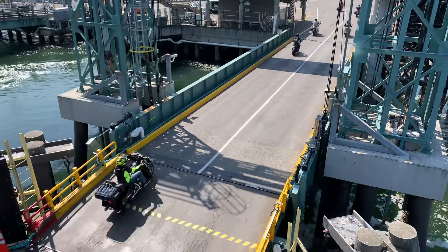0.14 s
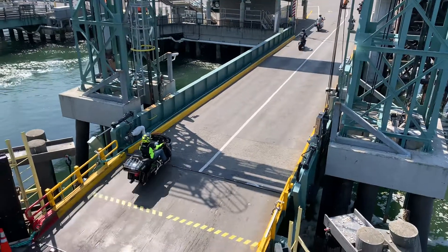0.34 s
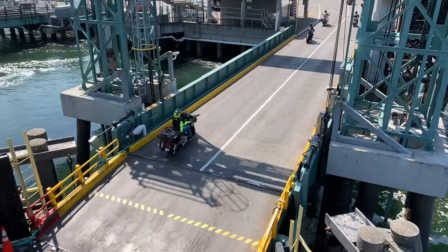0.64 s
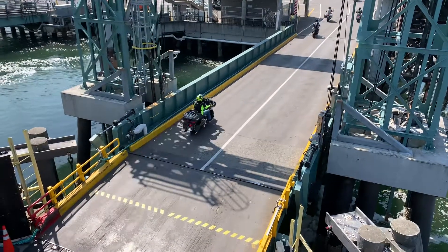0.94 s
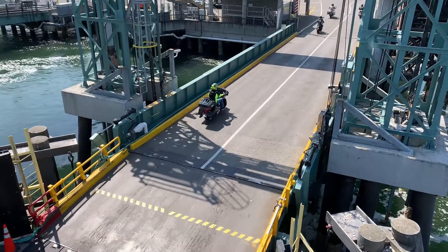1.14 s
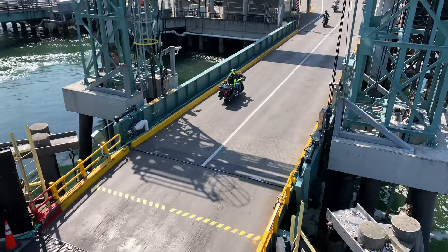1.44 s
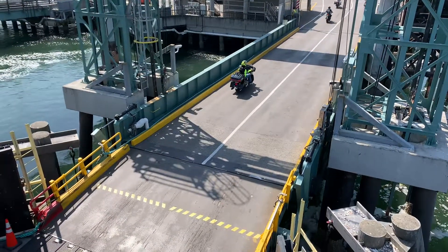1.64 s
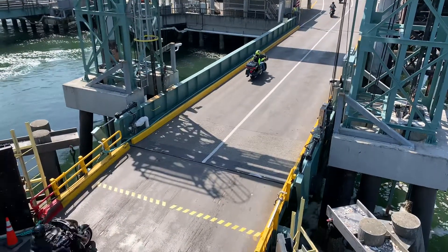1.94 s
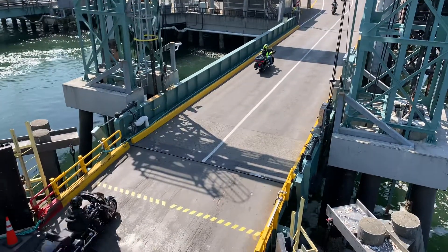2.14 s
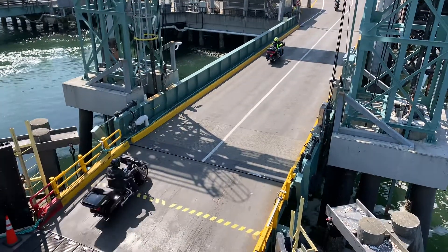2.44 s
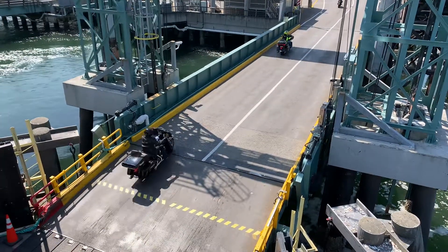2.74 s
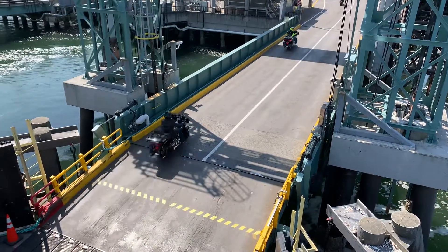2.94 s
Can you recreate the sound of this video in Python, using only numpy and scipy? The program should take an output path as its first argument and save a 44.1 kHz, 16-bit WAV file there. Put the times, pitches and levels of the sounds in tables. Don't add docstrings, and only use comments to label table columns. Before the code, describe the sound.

Motorcycle engines rumble and throb up a metal ramp over a steady roar and faint water hiss

```python
import sys
import numpy as np
from scipy import signal
from scipy.fft import rfft, irfft, next_fast_len
from scipy.io import wavfile

SR = 44100
rng = np.random.default_rng(int(sys.argv[2]) if len(sys.argv) > 2 else 0)


def generate_wav(sig):
    pcm = np.round(np.clip(np.atleast_2d(sig).T, -1, 1) * 32767).astype(np.int16)
    wavfile.write(sys.argv[1], SR, pcm)


def gain_from_db(level_db):
    decades = np.asarray(level_db, float) / 20
    return 10 ** decades


N = 136710

# (time [s], cycle rate [Hz])
TICKER_CYCLE = [
    (0.5, 17.05),
    (0.8, 18.12),
    (1.1, 19.12),
    (1.5, 20.27),
    (1.9, 21.42),
    (2.4, 21.52),
]
TICKER_START_TURNS = 0.627
# (time [s], boom level [dB], tick level [dB])
TICKER_NEARNESS = [
    (0.55, -71, -70),
    (0.72, -29, -52),
    (0.95, -29, -50),
    (1.3, -26.5, -48.5),
    (1.53, -26, -48),
    (1.7, -31, -49),
    (1.93, -26.5, -43),
    (2.1, -30.5, -43),
    (2.4, -35, -51),
]
# (frequency [Hz], common share [0-1])
PORT_LIKENESS = [(60, 1), (200, 0.96), (430, 0.81), (1000, 0.6), (2000, 0.35), (4400, 0.42), (6300, 0),
                 (7400, 1)]
# (frequency [Hz], level [dB])
LEFT_OVER_RIGHT = [(60, -.5), (130, -2.5), (290, 1), (640, 2.5), (1410, 3.5), (3100, 0), (6820, -3.5),
                   (15000, 5.5)]
SIDES = np.array([[1], [-1]])


def rms_one(x):
    return x / np.sqrt(np.mean(x ** 2) + 1e-20)


def in_time(rows):
    s, *columns = np.transpose(rows)
    return [np.interp(np.arange(N) / SR, s, c) for c in columns]


def at_hz(points, hz):
    points_hz, values = np.array(points)[:, 0], np.array(points)[:, 1]
    return np.interp(np.log(hz), np.log(points_hz), values)


def drift(rate_hz, step=1):
    r = np.exp(-80 * np.pi * rate_hz / SR)
    white = rng.standard_normal(N // 40 + 2002)
    slow = signal.lfilter([1], [1, -2 * r, r * r], white)[2000:]
    return np.interp(np.arange(0, N, step) / 40, np.arange(len(slow)), rms_one(slow))


def resonate(x, hz, width_hz):
    r = np.exp(-np.pi * width_hz / SR)
    zeros = np.array([1, 0, -1]) * (1 - r * r) / 2
    poles = [1, -2 * r * np.cos(2 * np.pi * hz / SR), r * r]
    return signal.lfilter(zeros, poles, x)


def port_noise():
    # (frequency [Hz], lag [turns])
    left_lag = [(1100, 0), (1500, .14), (2250, .15), (2950, .74), (4300, 1.02), (5100, 1.0), (7430, 2),
                (16000, 3.34)]
    white = rng.standard_normal((4, N))
    size = next_fast_len(N)
    lag_turns = np.interp(np.fft.rfftfreq(size, 1 / SR), *np.transpose(left_lag))
    white[1] = irfft(rfft(white[0], size) * np.exp(-2j * np.pi * lag_turns), size)[:N]
    return white


def ports(white, hz):
    alike = np.clip(at_hz(PORT_LIKENESS, hz), 0, 1)
    shared, own = white[[1, 0]], white[2:]
    balance = gain_from_db(at_hz(LEFT_OVER_RIGHT, hz) / 2 * SIDES)
    return balance * (np.sqrt(alike) * shared + np.sqrt(1 - alike) * own)


def exhaust(cycle_hz, boom_db, rasp_db, orders, start_turns):
    step = 8
    boom_below_hz, jitter, thump_spread_turns = 115, 0.002, 0.1
    flutter_db, flutter_hz, thump_uneven_db = 1.3, 3, 1.0
    turns = (np.cumsum(cycle_hz * (1 + jitter * drift(8))) / SR)[::step] + start_turns
    out = 0
    for multiple, db in orders:
        multiple = round(multiple)
        hz = multiple * cycle_hz.mean()
        effort_db = (boom_db if hz < boom_below_hz else rasp_db)[::step]
        alike = np.clip(at_hz(PORT_LIKENESS, hz), 0, 1)
        skew_rad = np.arccos(alike) / 2 * drift(2.7, step) * SIDES
        offset_turns = thump_spread_turns * rng.standard_normal()
        tone = -np.cos(2 * np.pi * (multiple * turns + offset_turns) + skew_rad)
        tone_db = effort_db + db + flutter_db * drift(flutter_hz, step)
        out = out + np.sqrt(2) * gain_from_db(tone_db) * tone
    uneven = gain_from_db(thump_uneven_db * drift(13.3, step))
    return signal.resample_poly(out * uneven, step, 1, axis=1)[:, :N]


def motorcycles():
    # (time [s], cycle rate [Hz], boom level [dB], rasp level [dB])
    first_effort = [(0.0, 14.9, -19.5, -15.5), (0.1, 15.1, -22.5, -19.5), (0.3, 15.45, -17.5, -21),
                    (0.45, 15.5, -21, -18.5), (0.62, 15.45, -18, -21), (0.73, 15.5, -33, -18),
                    (0.82, 15.55, -23.5, -20.5), (1.0, 15.65, -38, -22.5), (1.2, 15.7, -30, -30),
                    (1.6, 15.6, -47, -34)]
    second_effort = [(0.6, 16.6, -23, -51.5), (0.72, 17.7, -25.5, -34), (0.83, 16.8, -18, -26),
                     (0.95, 17.2, -26, -37), (1.1, 17.4, -20.5, -22.5), (1.4, 17.6, -22.5, -22.5),
                     (1.6, 16.94, -17, -21), (1.95, 18.06, -20.5, -20.5), (2.14, 18.64, -23.5, -23.5),
                     (2.3, 18.05, -18, -23), (2.64, 18.6, -16.5, -19), (2.8, 18.3, -21.5, -21),
                     (2.95, 21, -26, -22), (3.1, 19.7, -17.5, -19.5)]
    third_effort = [
        (2.0, 13.4, -32, -37),
        (2.2, 13.6, -27, -27),
        (2.62, 14.76, -35, -17),
        (2.8, 14.7, -22.5, -19),
        (2.95, 14.7, -21, -19),
        (3.1, 15.5, -14.5, -16),
    ]
    # (multiple of cycle [1], level [dB])
    first_orders = [(2, -14), (3, -36), (4, 0), (5, 1), (6, -7), (7, -12.5), (8, -7.5), (10, -9), (12, -8),
                    (14, -8), (16, -15), (20, -12.5), (24, -35), (28, -16)]
    second_orders = [(2, -21), (3, -2.5), (4, 0.5), (5, 0.5), (6, -20.5), (7, -13.5), (8, -17), (9, -8),
                     (10, -5.5), (11, -10), (15, -20), (13, -13), (17, -20), (19, -15.5), (21, -22.5),
                     (26, -17.5)]
    third_orders = [(2, -11), (4, 1.5), (5, -13), (7, -6.5), (8, -12), (9, -12.5), (12, -9), (14, -15),
                    (18, -13), (19, -22.5)]
    ticker_orders = [(2, -19), (5, 1.5), (7, 2.5), (9, -4.5), (16, -20), (18, -13)]

    out = exhaust(*in_time(first_effort), first_orders, start_turns=0.49)
    out = out + exhaust(*in_time(second_effort), second_orders, start_turns=0.46)
    out = out + exhaust(*in_time(third_effort), third_orders, start_turns=0.3)
    near_db = in_time(TICKER_NEARNESS)[0]
    cycle_hz = in_time(TICKER_CYCLE)[0]
    out = out + exhaust(cycle_hz, near_db, near_db, ticker_orders, TICKER_START_TURNS)
    return gain_from_db(-2.0 + at_hz(LEFT_OVER_RIGHT, 59) / 2 * SIDES) * out


def traffic_db():
    # (time [s], level [dB])
    ramp_traffic = [(0.0, -39), (.25, -43.5), (0.41, -42.5), (0.62, -42.5), (.72, -43.5), (0.91, -40.5),
                    (1.3, -39.5), (1.6, -41), (1.84, -40), (2.15, -42), (2.5, -38.5), (3.1, -42)]
    busy_db = in_time(ramp_traffic)[0]
    return busy_db - busy_db.mean()


def banded_noise(spectrum, low_hz, high_hz, patchy_db, swell_db):
    # (time [s], level [dB])
    deck_swell = [(0.0, 1), (0.5, -1), (0.7, -0.5), (1.05, 0.5), (1.2, -2), (1.5, -1), (1.7, 0.5),
                  (2.05, -0.5), (2.5, 1), (3.1, 0)]
    out, together = 0, drift(22.4)
    edges_hz = low_hz * 2 ** np.arange(0, np.log2(high_hz / low_hz), 1 / 2.5)
    white = [port_noise(), port_noise()]
    deck_db = in_time(deck_swell)[0]
    for k, (low, high) in enumerate(zip(edges_hz, edges_hz[1:])):
        hz = np.sqrt(low * high)
        sos = signal.butter(2, [low, high], "band", fs=SR, output="sos")
        band = signal.sosfilt(sos, ports(white[k % 2], hz))
        swell = swell_db * np.clip(np.log2(hz / 1600) / 1.1, 0, 1) + deck_db * (hz < 700)
        flicker_db = patchy_db * (0.6 * together + drift(26.0))
        out = out + gain_from_db(at_hz(spectrum, hz) + swell + flicker_db) * band
    return rms_one(out)


def deck_roar():
    # (frequency [Hz], density [dB per Hz])
    roar_spectrum = [(22, -33), (45, -6), (80, -7), (230, -9), (600, -26.5), (1050, -25.5), (2750, -31),
                     (3300, -32)]
    noise = banded_noise(roar_spectrum, 18, 4700, patchy_db=0.74, swell_db=traffic_db())
    edge = signal.cheby1(8, 1, 2870, fs=SR, output="sos")
    return signal.sosfilt(edge, gain_from_db(-21.5) * noise)


def churned_water():
    # (frequency [Hz], density [dB per Hz])
    water_spectrum = [(3300, -0.5), (4300, -1.5), (5700, -7), (8000, -4), (9500, -5.5), (12500, -10),
                      (14500, -17), (16500, -29)]
    return gain_from_db(-41.5) * banded_noise(water_spectrum, 3080, 17000, patchy_db=1.45, swell_db=0.7 * traffic_db())


def generator():
    hum_hz, hum_db = 358.2, -42.5
    return gain_from_db(hum_db + 1.7 * drift(3.4)) * np.sin(2 * np.pi * hum_hz * np.arange(N) / SR)


def fade_between(start_s, end_s):
    t = np.arange(N) / SR
    return np.clip(np.minimum(t - start_s, end_s - t) / 0.14 + 0.5, 0, 1)


def narrow_band(white, hz, width_hz):
    return rms_one(resonate(resonate(ports(white, hz), hz, width_hz), hz, width_hz))


def whines():
    # (frequency [Hz], width [Hz], level [dB], start [s], end [s])
    whine_bands = [
        (1074, 270, -44, -0.8, 3.4),
        (236.4, 23, -26, 0.605, 0.8),
        (4340, 1300, -45.5, 1.38, 2.205),
    ]
    white, out = port_noise(), 0
    for hz, width_hz, db, start_s, end_s in whine_bands:
        wavering = gain_from_db(db + 1.1 * drift(1.9))
        out = out + fade_between(start_s, end_s) * wavering * narrow_band(white, hz, width_hz)
    return out


def gears():
    # (start frequency [Hz], end frequency [Hz], level [dB], start [s], end [s])
    gear_slides = [(1850, 1990, -62, 0.083, 0.98), (982, 1080, -42, .2, 0.91), (1558, 1670, -42, .8, 1.65),
                   (2915, 3050, -45, 0.62, 2.7), (3280, 3350, -50.5, .72, 3.2),
                   (1134, 1210, -45.5, .9, 1.55), (2194, 2340, -45.5, 1.75, 3.0),
                   (1018, 910, -44.5, 1.75, 3), (845, 925, -37, 3, 3.05), (1343, 1200, -41, 2.45, 2.7),
                   (1634, 1720, -45.5, 2.3, 3.4)]
    white, t, out = port_noise(), np.arange(N) / SR, 0
    for from_hz, to_hz, db, start_s, end_s in gear_slides:
        band = signal.hilbert(narrow_band(white, from_hz, width_hz=0.047 * from_hz))
        slide_hz = np.interp(t, [start_s, end_s], [0, to_hz - from_hz])
        slid = np.real(band * np.exp(2j * np.pi * np.cumsum(slide_hz) / SR))
        out = out + fade_between(start_s, end_s) * gain_from_db(db + 1.6 * drift(2.2)) * slid
    return out


def ticks():
    # (frequency [Hz], width [Hz], level [dB])
    valve_rings = [(2940, 400, -20), (4510, 240, 1.5), (5440, 780, 2.5), (6300, 600, -1), (7900, 1100, 1),
                   (12600, 2000, -19)]
    # (time [s], level [dB], low rings [dB], high rings [dB])
    clear_ticks = [(0.6682, -35, -11, -11), (0.7206, -35, -7, -15), (0.746, -35, -9, -3),
                   (0.777, -28, -12, -10), (0.801, -27, -3, -16), (0.8323, -30, -7, -6),
                   (0.8562, -28, -3, -13), (0.8867, -32, -8, -9), (0.9106, -30, -6, -9),
                   (0.94, -26, -13, 0), (0.965, -30, -2, -11), (0.9929, -30, -15, -10),
                   (1.0179, -37, -11, -12), (1.0428, -32, -9, -10), (1.0723, -40, -15, -3),
                   (1.0997, -34, -13, -10), (1.1511, -30, -3, -9), (1.2538, -29, -6, -11),
                   (1.3062, -36, -10, -9), (1.3272, -32, -11, -7), (1.3631, -28, -9, -7),
                   (1.4066, -28, -12, -13), (1.4289, -26, -9, -12), (1.4559, -26, -9, -8),
                   (1.4763, -29, -10, -11), (1.5057, -27, -9, -8), (1.5273, -27.5, -1, -11),
                   (1.5544, -26, -6, -13), (1.5756, -42, -6, -12), (1.7013, -30, -3, -10),
                   (1.733, -30, -3, -7), (1.7942, -33, -9, -12), (1.8153, -37, -12, -16),
                   (1.8405, -36, -9, -11), (1.8903, -20, -11, -20), (1.9118, -28, -9, -10),
                   (1.9373, -22, -12, -8), (1.9582, -28, -7, -9), (1.9832, -36, -13, -11),
                   (2.0051, -34, -12, -9), (2.0944, -35, -9, -10), (2.1493, -31, -14, -10),
                   (2.1886, -29, -12, -13), (2.2286, -31, -7, -11), (2.3977, -31, -11, -12),
                   (2.4516, -33, -8, -8), (2.511, -29, -6, -9), (2.553, -26, -11, -11)]
    second_firing_turns, high_rings_hz = 0.45, 5800
    decay_s, scatter_db, snap = 0.0049, 2, 4.4

    turns = np.cumsum(in_time(TICKER_CYCLE)[0]) / SR + TICKER_START_TURNS
    firings = np.floor(turns) + np.floor(turns - second_firing_turns)
    fired = np.diff(firings, prepend=0) > 0
    faint = fired * gain_from_db(in_time(TICKER_NEARNESS)[1] - 5.5 + 53)
    s, tick_db, low_db, high_db = np.transpose(clear_ticks)
    at = (s * SR).astype(int)
    out, white = 0, port_noise()
    for hz, width_hz, db in valve_rings:
        kicks = faint * gain_from_db(scatter_db * rng.standard_normal(N))
        colour_db = high_db if hz > high_rings_hz else low_db
        kicks[at] += gain_from_db(0.92 * (tick_db + colour_db + 37) + 3.2 * rng.standard_normal(len(s)))
        kicks = gain_from_db(db) * kicks
        burst = signal.lfilter([1], [1, -np.exp(-1 / (decay_s * SR))], kicks + 1e-18)
        struck = burst * ports(white, hz) + snap * kicks
        out = out + resonate(struck, hz, width_hz) / np.sqrt(width_hz)
    return gain_from_db(-7) * out


def scene():
    engines = motorcycles() + whines() + gears() + ticks()
    return engines + deck_roar() + churned_water() + generator()


def low_pass(x):
    return signal.sosfilt(signal.butter(12, 15630, fs=SR, output="sos"), x)


def record(dry):
    # (frequency [Hz], width [Hz], share removed [0-1])
    housing_hollows = [(3200, 290, 0.097), (5640, 170, 0.66), (1498, 450, 0.38)]
    for hz, width_hz, share in housing_hollows:
        dry = dry - np.clip(share, 0, 1) * resonate(dry, hz, width_hz)
    mix = 0.83 * np.tanh(dry / 0.77)
    return low_pass(mix)


dry = scene()
out = record(dry)
generate_wav(out)
```